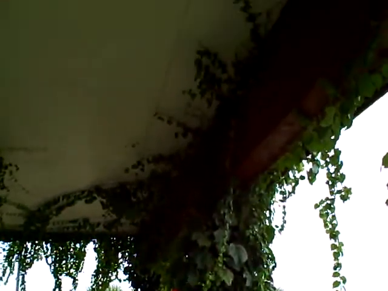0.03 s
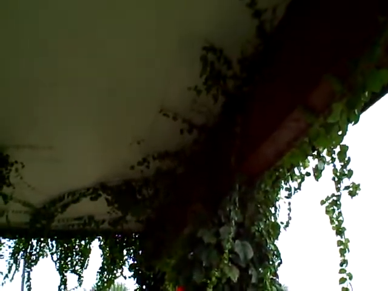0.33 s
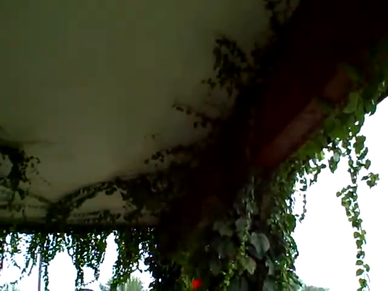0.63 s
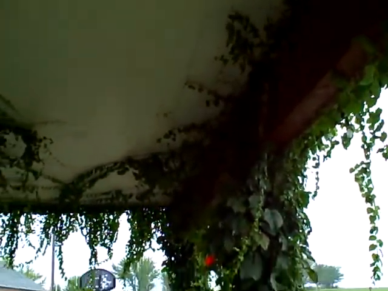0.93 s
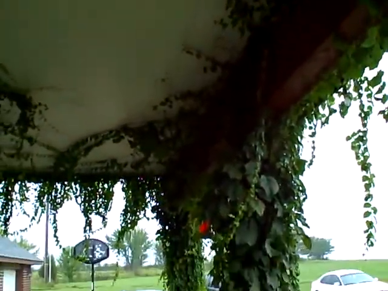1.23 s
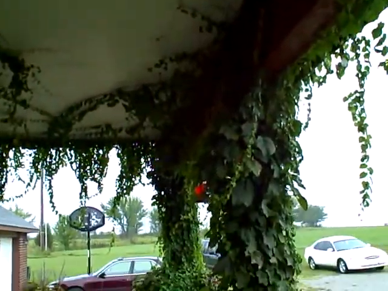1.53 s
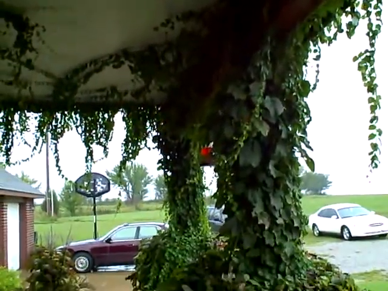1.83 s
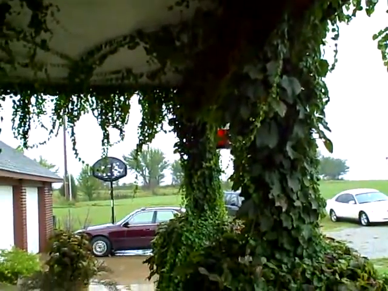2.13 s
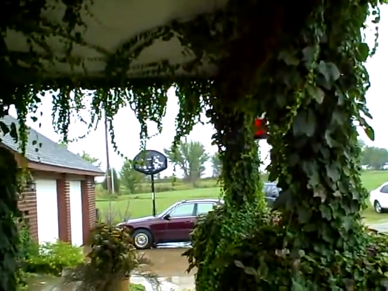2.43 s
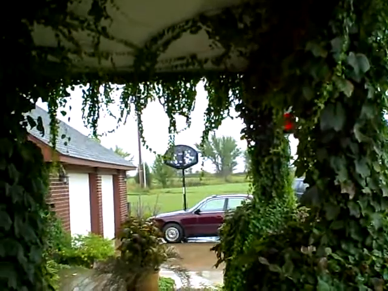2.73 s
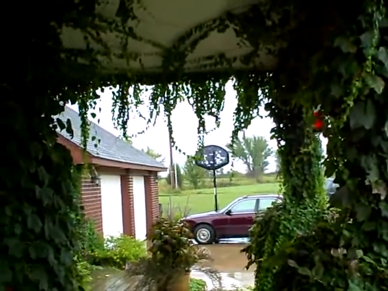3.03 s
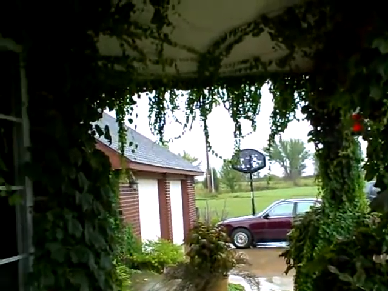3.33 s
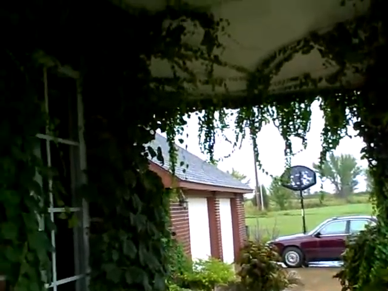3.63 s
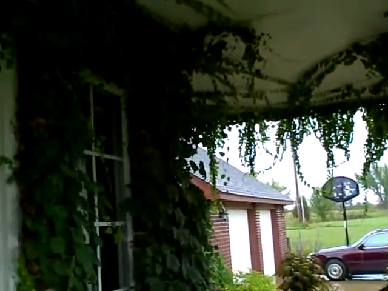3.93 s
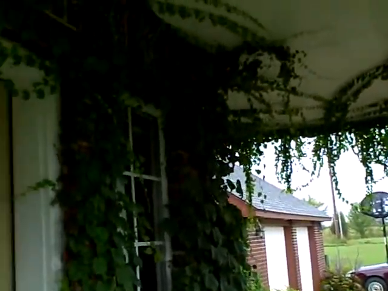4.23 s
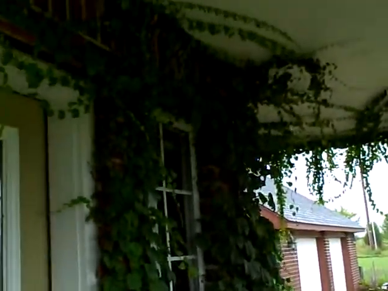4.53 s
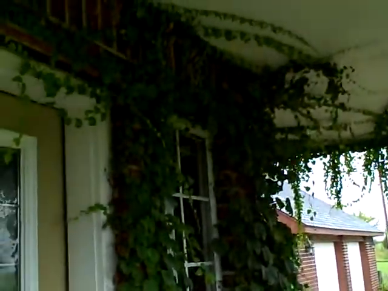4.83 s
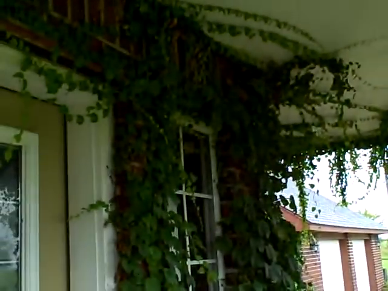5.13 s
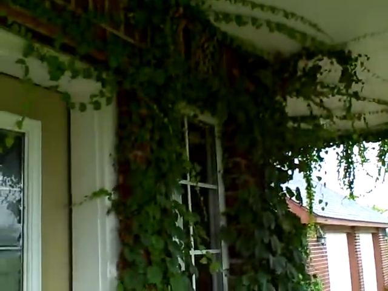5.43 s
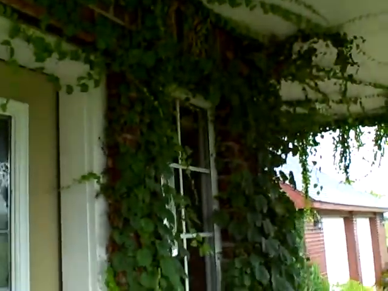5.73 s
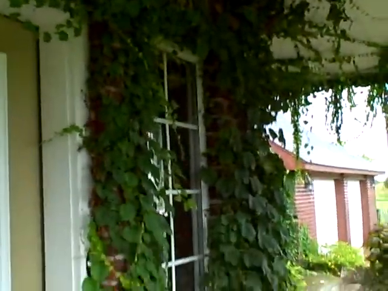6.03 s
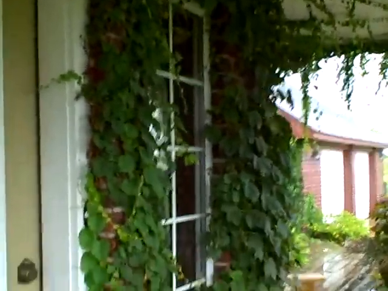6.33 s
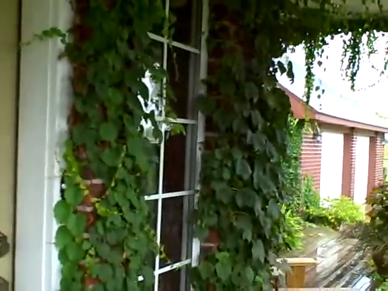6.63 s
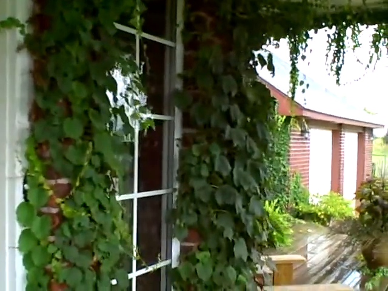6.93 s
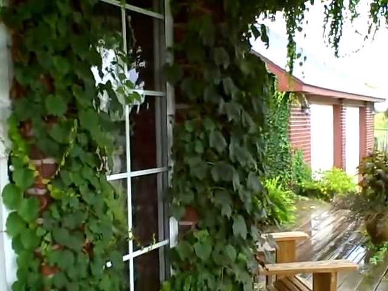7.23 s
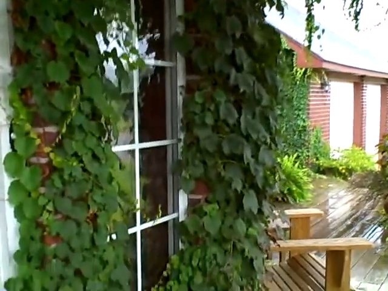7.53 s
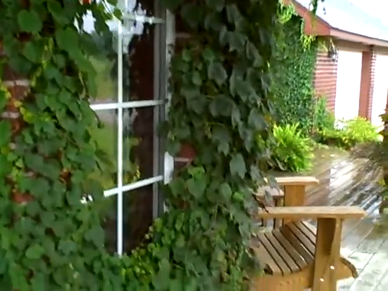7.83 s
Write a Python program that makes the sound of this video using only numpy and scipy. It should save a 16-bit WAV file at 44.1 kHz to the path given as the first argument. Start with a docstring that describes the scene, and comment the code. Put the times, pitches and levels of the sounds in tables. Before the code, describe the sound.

Light rain falls around a covered porch. Fat drips from the eaves slap down close to the microphone at uneven times, each with a short echo, while small drops tick on leaves and decking. Behind them lie a soft hiss, a low outdoor rumble and a far engine hum. A few faint scuffs and squeaks come late, then a door latch snaps and the door thuds shut.

```python
"""Light rain around a porch

Fat drips from the eaves slap down close by and echo under the porch ceiling. Small drops
patter on the vines and deck, and rain in the yard blends into a soft wash and hiss.
Behind it are a low outdoor rumble, far traffic and a thin whine. Late on come a few
faint scuffs and squeaks; near the end a door latch snaps and the door thuds and rings low."""
import sys
import numpy as np
from scipy import signal
from scipy.fft import rfft, irfft, next_fast_len
from scipy.io import wavfile
from scipy.ndimage import map_coordinates

SR = 44100
rng = np.random.default_rng(int(sys.argv[2]) if len(sys.argv) > 2 else 0)


def file_out(sig):
    """Save sig as 16-bit WAV at sys.argv[1]."""
    # one column per channel
    cols = np.atleast_2d(sig).T
    # limit, then scale
    lim = np.clip(cols, -1, 1)
    pcm = np.round(lim * 32767).astype(np.int16)
    wavfile.write(sys.argv[1], SR, pcm)


N = 351918
TIME = np.arange(N) / SR

# Fat drips close by. Each row: start in seconds, relative level in dB, relative slap strength in dB,
# spray pitch in Hz, echo compared with the direct sound in dB.
NEAR_DRIPS = [(.1885, -34, -17.5, 6390, -2), (0.4357, -35.5, -14.5, 6190, -3), (.647, -38.5, -23, 6370, 0),
              (1.1228, -31, -11, 6260, -4.5), (1.2497, -31.8, -25, 6400, -4), (1.376, -38, -17, 5600, 3),
              (1.959, -37.5, -14, 7400, 3), (2.136, -39.5, -11, 6000, 4), (2.6453, -32, -17.5, 6700, -5.5),
              (2.890, -39, -10.5, 7000, 5), (3.353, -34, -20, 7190, 4), (3.432, -35, -14.5, 6700, 0),
              (3.7284, -38, -12.5, 6760, 2), (4.5449, -36.5, -16.5, 6760, 0), (4.5896, -37, -13.5, 6380, 3),
              (4.691, -33.5, -14.5, 5700, -3), (4.9194, -39, -13.5, 6420, -2),
              (5.0658, -34.5, -17, 6540, 1), (5.0873, -36.5, -11, 5800, -2), (5.564, -31.5, -23, 6340, -2),
              (5.67, -37.5, -21, 5830, 2), (5.803, -35, -28, 6440, 4), (6.115, -38.5, -16, 6900, 4),
              (6.302, -39, -13, 6300, 2), (6.38, -37.5, -17, 6350, 3), (7.0135, -35.5, -24, 5900, 5),
              (7.1847, -35, -16, 6700, 7), (7.4638, -36, -12.5, 6200, -1)]
# The latch's hits. Each row: start in seconds, relative level in dB, relative clack strength in dB.
LATCH_HITS = [(7.559, -24.5, 0.5), (7.5612, -17.5, -11), (7.5671, -22, -13.5), (7.5723, -31, -10),
              (7.585, -29, -9)]
# Ringing notes. Each row: pitch in Hz, relative level in dB, seconds to fade by 60 dB.
LATCH_NOTES = [(1150, -7, .1), (2730, -12, .2), (3480, 0, 0.21), (4160, -3, 0.12), (5570, -5, .17),
               (5970, -5, .18), (6000, -8, 0.19), (6100, -5, .16), (6840, -4.5, 0.11), (7400, 3, 0.084),
               (7540, -4, .16)]
DOOR_NOTES = [(55.5, -24, 0.4), (167, -47, 0.28), (229, -44, 0.31), (331, -56, 0.26)]
# Sounds that swell and fade. Each row: loudest moment in seconds, about half the length in seconds,
# pitch in Hz, width around that pitch in Hz, level in dB.
SCUFF_SWELLS = [(5.447, 0.018, 2500, 1400, -52), (5.906, .008, 5970, 400, -52),
                (6.07, 0.0074, 5980, 300, -48), (7.395, 0.018, 3630, 520, -53.5),
                (7.41, 0.031, 6050, 1800, -51.5)]
FAINT_TONES = [(1.0, 0.43, 273.4, 6.5, -65), (1.4, 0.38, 820, 32, -65.5), (1.5, 2, 597.5, 15, -68.5),
               (2.6, 2, 425, 26, -67.5), (5.95, 0.49, 743, 28, -67), (7.85, 0.43, 205, 12, -59)]  # far traffic, except the last row: a low ring from the door
# Tone colours of the noises. Each row: frequency in Hz, relative strength there in dB.
SPLASH_COLOUR = [(300, -27.5), (1000, -17), (2500, -11), (4800, -8), (5800, 1), (6400, 3), (7300, 0.5),
                 (8000, -8.5), (8600, -18), (9200, -42)]  # bright spray
SLAP_COLOUR = [(200, -18.5), (650, 0), (1000, -2.5), (1600, -3.5), (2800, -1.5), (4000, 3), (5200, 4.5),
               (7000, -27)]  # duller smack of a drop
SNAP_COLOUR = [(500, -28), (1900, -18), (2600, -8.5), (3400, -6), (4200, -4), (4750, -24), (5450, 5.5),
               (6500, -3), (7300, 2), (8000, -16.5), (9000, -35)]  # sharp part of a latch hit
CLACK_COLOUR = [(150, -17), (450, 2), (700, -4), (1200, -1.5), (1700, -2), (2600, -6), (3500, 1.5),
                (6000, -27)]  # lower part of a latch hit
RUMBLE_COLOUR = [(12, -12.5), (24, -1), (36, 3.5), (44, -4.5), (58, 1), (78, -1), (92, -2.5), (105, -7),
                 (127, -8.5), (150, -13), (200, -27.5), (400, -62)]  # open air
WASH_COLOUR = [(90, -19.5), (160, -0.5), (215, 3.5), (260, 2), (420, 0), (500, -2), (600, -2), (830, -3),
               (1000, -6.5), (1300, -15.5), (2200, -21), (5000, -42.5)]  # low part of far rain
HISS_COLOUR = [(710, -42.5), (1200, -9), (2210, -11), (3540, -9.5), (4440, -10.5), (5300, -7.5),
               (6420, 2.5), (7290, -3.5), (8400, -20), (8910, -43.5), (11600, -58), (19600, -120)]  # high part of far rain
# The porch's echo. Each row: frequency in Hz, seconds to fade by 60 dB.
ECHO_FADES = [(200, .3), (2000, 0.18), (8000, 0.19)]


def drip(db, slap_db, spray_hz, echo_db):
    """One drip touches down softly, then slaps and bursts into spray; droplets land for a moment."""
    t = TIME[:SR // 4] - 0.004  # the burst comes 4 ms after the first touch
    touch = amp(-1.5) * fade(t + 0.004, 0.01)
    onset = np.clip(t / 0.00067, 0, 1)
    burst = fade(t, 0.026)
    droplets = amp(-14) * fade(t, 0.13)
    splash = noise(SPLASH_COLOUR, len(t))
    fizz = unit(filtered(splash, lambda hz: resonance(hz, spray_hz, width=2000)))
    spray = onset * (burst + droplets) * fizz
    slap = amp(slap_db + 8.5) * (onset * burst + touch) * noise(SLAP_COLOUR, len(t))
    echo_gain = np.hypot(1, amp(echo_db))  # divided out, so more echo is not louder
    return amp(db - 4.5) * porch_echo(spray + slap, echo_db) / echo_gain


def eaves(far_drips_per_s=3.6):
    """The eaves drip: fat drops close by, and smaller ones at uneven times farther off."""
    out = np.zeros(N)
    for start, db, slap_db, spray_hz, echo_db in NEAR_DRIPS:
        add(out, start - 0.004, drip(db, slap_db, spray_hz, echo_db))  # the burst lands on the start
    chances = rng.uniform(-1, 1, (int(far_drips_per_s * N / SR), 4))
    for slot, (delay, size, slap, pitch) in enumerate(chances):
        sound = drip(db=-40 + 1.2 * size, slap_db=-17.5 + 5 * slap,
                     spray_hz=6500 + 730 * pitch, echo_db=6)
        add(out, (slot + (delay + 1) / 2) / far_drips_per_s, sound)
    return out


def drops(count, spread_db):
    """Raindrops land at random as tiny bursts of noise: many small, a few large."""
    when, rank = rng.random((count, 2)).T
    size = amp(-spread_db * np.log(rank + 1 / 50))
    hits = np.bincount((when * N).astype(int), size ** 2, N)
    energy = signal.fftconvolve(hits, fade(TIME[:SR // 50], 0.0034))[:N]
    return np.sqrt(np.abs(energy)) * rng.standard_normal(N)


def patter():
    """Small drops tick on the vines; duller ones tap on the deck."""
    leaves = coloured(porch_echo(drops(count=1200, spread_db=3), echo_db=0), SPLASH_COLOUR)
    deck = coloured(porch_echo(drops(count=260, spread_db=1), echo_db=0.5), SLAP_COLOUR)
    return amp(-60) * leaves + amp(-69) * deck


def door(thud_s=7.6125):
    """The metal latch rattles home and rings; just after, the door thumps its frame."""
    out, t = np.zeros(N), TIME[:SR // 2]
    for start, db, clack_db in LATCH_HITS:
        snap = noise(SNAP_COLOUR, len(t))
        clack = amp(clack_db - 5.5) * noise(CLACK_COLOUR, len(t))
        ring = np.zeros(len(t))
        for hz, note_db, fade_s in LATCH_NOTES:
            strength = amp(note_db + rng.normal(0, 2))  # each hit rings a little differently
            ring += strength * fade(t, fade_s) * np.sin(2 * np.pi * (hz * t + rng.random()))
        click = porch_echo(fade(t, 0.014) * (snap + clack), echo_db=-1)
        add(out, start, amp(db - 1.5) * (click + amp(-28.5) * ring))
    thud = sum(amp(db) * fade(t, fade_s) * np.sin(2 * np.pi * hz * t) for hz, db, fade_s in DOOR_NOTES)
    onset = 1 - np.exp(-t / 0.0012)
    add(out, thud_s, onset * thud)
    return out


def scuffs():
    """Brief, grainy scuffs and squeaks, each around one pitch."""
    return swells(SCUFF_SWELLS, rough_db=3.5)


def yard(turn_start_s=2, turn_end_s=5):
    """Far rain blends into a wash and a hiss over the rumble of the open air."""
    # The listener turns from the yard to the house wall, which shades the low sounds; the hiss grows.
    turned = np.clip((TIME - turn_start_s) / (turn_end_s - turn_start_s), 0, 1)
    rumble = amp(-44.5 - 0.5 * turned + 0.43 * wobble(2)) * noise(RUMBLE_COLOUR)
    wash = amp(-56.5 - 0.93 * turned + 0.6 * wobble(5.8)) * noise(WASH_COLOUR)
    hiss = amp(-58 + 1.85 * turned + 0.6 * wobble(8.4)) * noise(HISS_COLOUR)
    return rumble + wash + hiss


def engine(rise_hz_per_s=0.66, fade_db_per_s=1.0):
    """A far engine hums unevenly, speeding up a little as it slowly fades."""
    db = -47 - fade_db_per_s * TIME + 1.1 * wobble(3.3)
    hz = 66.5 + rise_hz_per_s * TIME + 0.5 * wobble(3.99)
    return amp(db) * tone(hz)


def faint_tones():
    """Far traffic sings faintly; last, a low ring from the door swells and fades around its thud."""
    return swells(FAINT_TONES, rough_db=0)


def whine():
    """A thin, high whine: two faint tones an octave apart."""
    hz = 3516 + 4 * wobble(20)
    return amp(-79) * tone(hz) + amp(-73.5) * tone(2 * hz)


def porch_echo(sound, echo_db):
    """A sound plus its bounces between ceiling, wall and floor."""
    hz, t, bands = signal.stft(rng.standard_normal(SR // 3), SR, nperseg=256)
    tail = signal.istft(bands * fade(t, along(ECHO_FADES, hz)[:, None]), SR, nperseg=256)[1]
    tail *= np.clip(TIME[:len(tail)] / 0.006, 0, 1)  # the nearest walls are a few milliseconds away
    echo = signal.fftconvolve(sound, tail / np.linalg.norm(tail))[:len(sound)]
    return sound + amp(echo_db) * echo


def swells(rows, rough_db):
    """Narrow bands of noise swell and fade; roughness makes them grainy."""
    out = np.zeros(N)
    grain = amp(rough_db * wobble(400))
    for peak_s, half_s, hz, width, db in rows:
        grainy = rng.standard_normal(N) * grain
        near = np.abs(TIME - peak_s) < 4 * half_s
        band = unit(filtered(grainy[near], lambda f: resonance(f, hz, width) ** 4))
        swell = np.exp(-0.5 * ((TIME[near] - peak_s) / half_s) ** 2)
        out[near] += amp(db) * swell * band
    return out


def amp(db):
    """Turn decibels into a number to multiply by."""
    return 10 ** (np.asarray(db) / 20)


def unit(sound):
    """Scale a sound to an average strength (rms) of 1."""
    return sound / np.sqrt(np.mean(sound ** 2) + 1e-20)


def along(points, hz):
    """Read between a table's rows, with octaves evenly spaced."""
    frequencies, values = np.transpose(points)
    return np.interp(np.log(hz + 1), np.log(frequencies), values)


def wobble(rate):
    """A smooth random curve through `rate` new values a second."""
    return map_coordinates(rng.standard_normal(1024), [TIME * rate], mode="wrap")


def tone(hz):
    """A pure tone of strength 1 that follows a changing pitch."""
    return np.sqrt(2) * np.sin(2 * np.pi * np.cumsum(hz) / SR)


def resonance(hz, centre, width):
    """A gain that is 1 at the centre frequency and falls on both sides."""
    return 1 / np.sqrt(1 + ((hz - centre) / width) ** 2)


def filtered(sound, gain):
    """Turn each frequency up or down by gain(hz)."""
    size = next_fast_len(len(sound) + 2048)
    hz = np.fft.rfftfreq(size, 1 / SR)
    return irfft(rfft(sound, size) * gain(hz), size)[:len(sound)]


def coloured(sound, colour):
    """Give a sound a tone colour and a strength of 1."""
    return unit(filtered(sound, lambda hz: amp(along(colour, hz))))


def noise(colour, size=N):
    """Noise with a tone colour and a strength of 1."""
    return coloured(rng.standard_normal(size), colour)


def fade(t, fade_s):
    """Start at t = 0 and die away by 60 dB every fade_s seconds."""
    return (t >= 0) * np.exp(-np.log(1000) * np.abs(t) / fade_s)


def add(track, start_s, sound):
    """Mix a sound into the track at its start time."""
    part = track[round(start_s * SR):][:len(sound)]
    part += sound[:len(part)]


def scene():
    """Everything heard from under the porch roof, in one channel."""
    background = yard() + engine() + whine() + faint_tones()
    return (background + patter() + eaves() + scuffs() + door())[None]


def record(dry):
    """Cut away the highest treble."""
    top_hz, slope_width_hz = 9030, 300
    return filtered(dry[0], lambda hz: np.clip((top_hz - hz) / slope_width_hz + 0.5, 0, 1))[None]


dry = scene()
out = record(dry)
file_out(out)
```